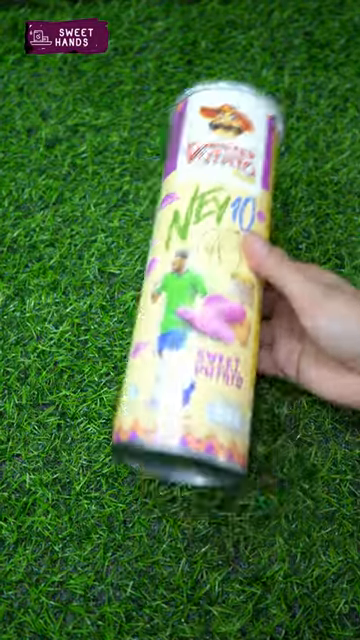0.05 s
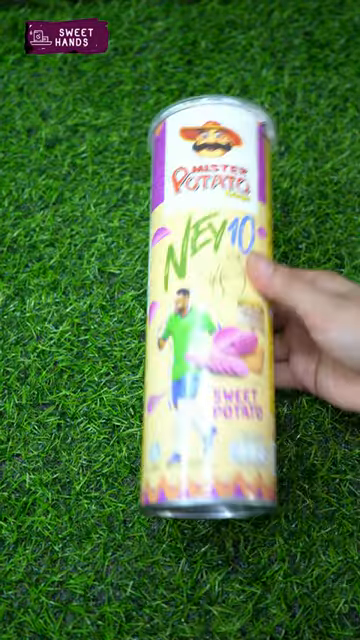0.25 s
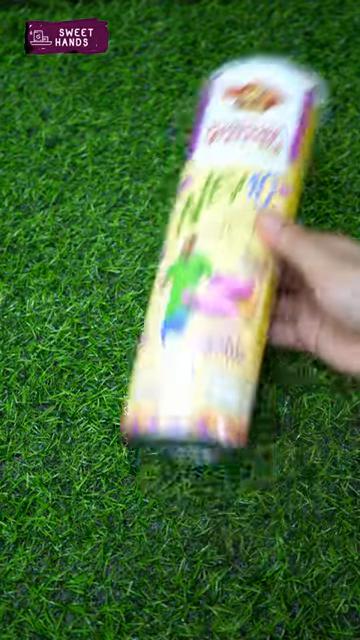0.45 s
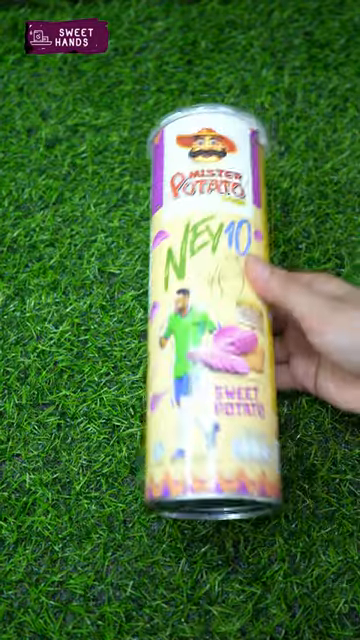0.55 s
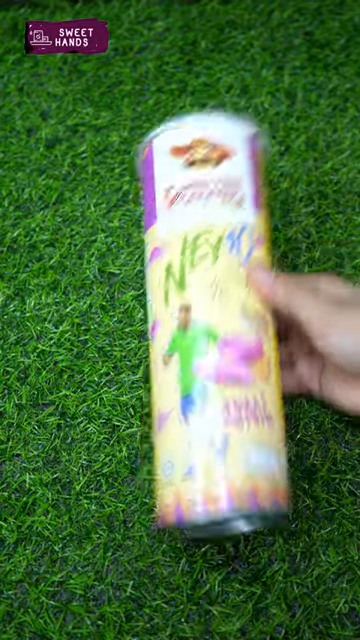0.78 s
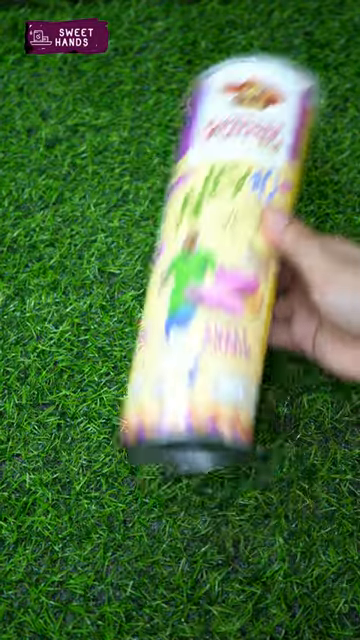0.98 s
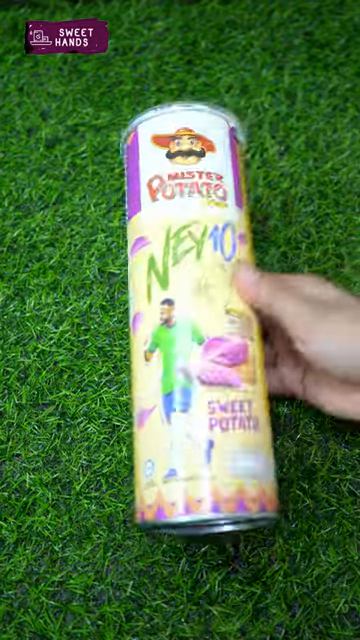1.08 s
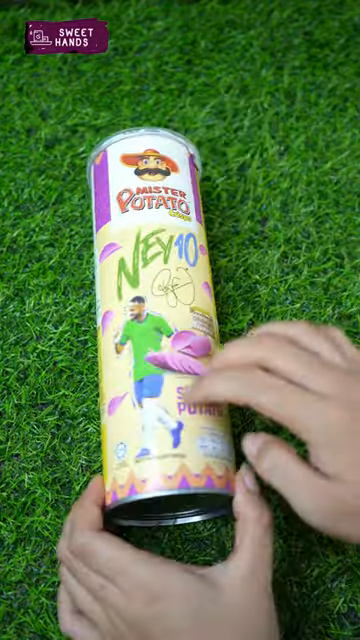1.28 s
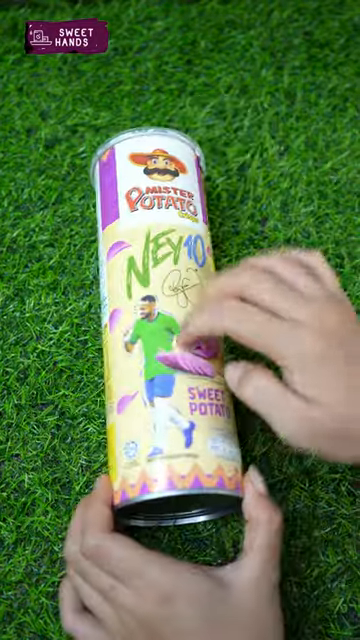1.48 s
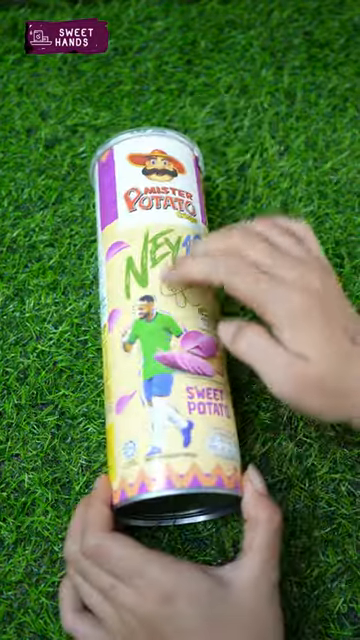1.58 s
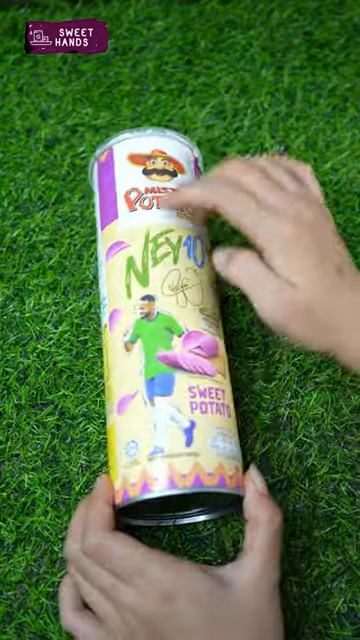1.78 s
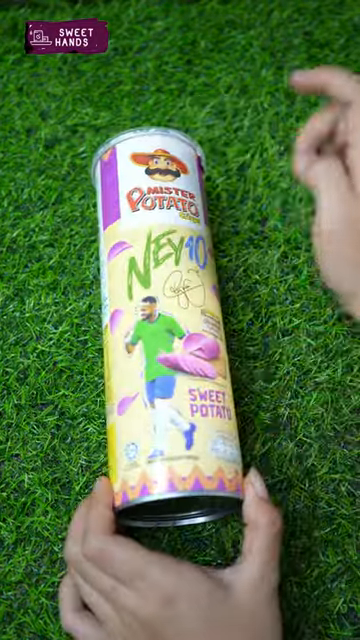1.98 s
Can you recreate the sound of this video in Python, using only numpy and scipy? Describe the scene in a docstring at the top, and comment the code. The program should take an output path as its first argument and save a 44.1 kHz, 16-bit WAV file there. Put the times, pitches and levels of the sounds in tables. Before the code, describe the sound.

Crisps rattle in a shaken cardboard can, then fingernails tap its side.

```python
"""A cardboard can of crisps is shaken lengthwise four times, close up in a small room. The stack slides and
crumbles against the metal base and the plastic lid in turn, and whole crisps knock on both ends. The shaking
ends and all sound drops to silence for a split second. Then the can lies still: fingernails tap its side eight
times while the crisps shift faintly inside."""
import sys
import numpy as np
from scipy import signal
from scipy.fft import rfft, irfft
from scipy.io import wavfile
from scipy.ndimage import uniform_filter1d

SR = 44100
rng = np.random.default_rng(int(sys.argv[2]) if len(sys.argv) > 2 else 0)


def file_out(sig):
    """Save sig as 16-bit WAV at sys.argv[1]."""
    # one column per channel
    cols = np.atleast_2d(sig).T
    # limit, then scale
    lim = np.clip(cols, -1, 1)
    pcm = np.round(lim * 32767).astype(np.int16)
    wavfile.write(sys.argv[1], SR, pcm)


N = 90404
T = np.arange(N) / SR

# stereo image of the textures: (frequency [Hz], left-right correlation)
CORRELATION = [(100, 1), (600, 0.88), (1800, 0.71), (4000, 0.38), (12000, 0.32)]
# spectra of room tone, resting crisps and rubbing crisps: (frequency [Hz], density [dB])
ROOM_TONE_COLOUR = [(15, -41), (25, 1.5), (64, -3), (137, -9.5), (212, -5.5), (256, -6), (1370, -24),
                    (1700, -28), (16000, -36)]
RUSTLE_COLOUR = [(100, -7), (190, 1), (330, -5), (520, 4.5), (700, -2), (1330, -7), (1800, -0.5),
                 (2400, -7.5), (3800, -8.5), (7000, -16), (12000, -18.5), (16000, -30)]
CRUNCH_COLOUR = [(100, -16.5), (300, -16), (800, 3), (1500, 5), (2300, 2.5), (3000, 4.5), (5000, -1),
                 (7500, -3), (11000, -2), (13500, -7), (16000, -17.5)]
# envelope of the shifting crisps: (time [s], level [dB])
RUSTLE_ENVELOPE = [(.11, -62.5), (.128, -36), (.155, -46), (.17, -53), (1.19, -45), (1.235, -46),
                   (1.33, -47.5), (1.478, -46.5), (1.495, -41), (1.515, -49), (1.59, -44), (1.69, -48.5),
                   (1.78, -42.5), (1.83, -45.5), (1.9, -44), (1.95, -51.5), (2.05, -55)]
# hand bumping the can: (time [s], pitch [Hz], level [dB])
GRIP_BUMPS = [(.375, 55.7, -39.5), (1.797, 62.5, -37), (1.871, 49, -47)]
# a crisp or nail scratching: (time [s], level [dB], decay [s])
SCRATCH_CUES = [(0.129, -24.5, 0.0015), (0.352, -26, .005), (.636, -18.5, 0.0054), (0.886, -19, 0.004),
                (0.277, -19.5, 0.0024), (.427, -19, 0.0031), (.598, -21.5, 0.014), (0.652, -16, 0.0025),
                (0.911, -18.5, 0.004), (1.16, -12.5, 0.0095), (1.192, -20, 0.004), (1.491, -37.5, 0.0077),
                (1.632, -31.5, 0.002), (1.857, -31.5, 0.013), (1.9, -38.5, 0.0049)]
# air modes of the tube sounding: (time [s], pitch [Hz], level [dB])
HOOTS = [(.585, 637, -13.5), (0.622, 1130, -14.5), (.811, 671, -11.5), (.843, 674, -18), (1.082, 680, -28),
         (1.155, 1136, -24)]
# finger taps: (time [s], level [dB], wall pitch [Hz], nail [dB], thump [dB],
# nail brightness [Hz], wall ring length [ratio])
FINGER_TAPS = [(1.193, -25.5, 1740, 2, 8, 6000, 1.1), (1.2932, -17, 1745, 3, -5, 3500, 0.63),
               (1.3526, -26, 1720, 9.5, 6, 8040, 1.2), (1.4489, -15, 1804, -1.5, -2, 7050, 1),
               (1.5375, -20.5, 1797, 2.5, -3.5, 7800, 1.23), (1.6166, -17.5, 1866, 3, -4.5, 7300, 0.84),
               (1.7133, -17.5, 1884, 1, -8, 8150, 0.91), (1.7974, -16, 1757, 1.5, -18, 8000, 0.86)]
# modes of the side wall: (frequency [multiple of wall pitch], level [dB], t60 [s])
SIDE_WALL_MODES = [(.9, -14, 0.0069), (1, 1, 0.015), (1.62, -4.5, 0.006), (2.08, 1, 0.0055),
                   (3.0, -11, 0.0071)]
# modes of the whole can, struck on its side, base or lid: (frequency [Hz], level [dB], t60 [s])
WHOLE_TUBE_MODES = [(537, -12, 0.055), (660, -11.5, 0.0276), (786, -15.5, 0.034), (965, -9, 0.012)]
METAL_BASE_MODES = [(397, -7, 0.011), (486, -4, 0.028), (668, -4, 0.026), (732, -5.5, 0.037),
                    (1130, -13, 0.024), (1630, -3, .012), (1802, 3, .02), (3500, -8, 0.012)]
PLASTIC_LID_MODES = [(470, -24.5, 0.061), (628, -5, 0.032), (783, 3.5, .022), (1130, -4.5, 0.021),
                     (1720, -1.5, 0.018), (1866, 5, 0.017), (2670, -2.5, 0.014), (3490, -6, 0.024),
                     (4656, -9, 0.023), (6090, -6, 0.018), (7740, -6.5, 0.011), (9120, -8, 0.014)]
# the stack landing on an end: (time [s], level [dB], rise [s], fall [s])
BASE_LANDINGS = [(.238, -28.5, 0.016, 0.053), (.505, -24, 0.026, 0.03), (.775, -25, 0.032, 0.029),
                 (1.046, -24.5, 0.037, 0.026)]
LID_LANDINGS = [(.361, -20.5, 0.017, .024), (.638, -21.5, 0.026, 0.028), (.898, -24, 0.031, 0.037),
                (1.165, -22, 0.032, .028)]
# whole crisps knocking on an end: (time [s], thud [dB], crack [dB])
BASE_CRISP_HITS = [(.128, -33.5, -30), (.139, -59, -36), (.154, -41, -37.5), (.226, -19, -46),
                   (.316, -23, -32), (0.4845, -15, -21.5), (0.504, -18.5, -31), (.517, -10.5, -29),
                   (0.5243, -10, -16.5), (.5315, -8.5, -19), (.552, -50, -22), (0.7614, -21, -18.5),
                   (.7835, -43, -18), (0.775, -12.5, -46), (.788, -8, -28), (.815, -18, -27),
                   (.829, -26, -19.5), (1.028, -16, -25), (1.049, -18.5, -17.5), (1.069, -6.5, -24)]
LID_CRISP_HITS = [(0.366, -51, -21), (.374, -22.5, -19), (.402, -36, -29), (.617, -20, -19),
                  (.653, -22, -35), (.877, -25.5, -25), (.891, -41, -16), (.912, -16.5, -19.5),
                  (1.155, -22, -20.5)]

CONTACTS_PER_S, END_HITS_PER_S, SIZE_SPREAD_DB = 24000, 3000, 2
CRUMBLE_DB, CRUMBLE_S, THUD_HZ, CRACK_HZ = -9, 0.0036, 920, 1480
NAIL_TICK_DB, NAIL_GRIT_DB, NAIL_GRIT_S, NAIL_TOP_HZ = 11.5, -3.5, 0.0029, 14200
THUMP_DB, THUMP_DELAY_S, WALL_SCATTER_DB = -9, 0.0027, 1.5
SHAKE_REVERB_DB, TAP_REVERB_DB = -15, -19
SHAKE_END_S, RESUME_S, FADE_S = 1.172, 1.1915, 0.013


def amp(db):
    """Decibels to gain."""
    return 10 ** (np.asarray(db) / 20)


def unit(x):
    """Scale to rms 1."""
    return x / np.sqrt(np.mean(x ** 2) + 1e-20)


def pan(x, left_db):
    """Opposite trims on left and right."""
    return x * amp([[left_db], [-left_db]])


def cut(x, hz, kind, order=2):
    """Low- or high-pass."""
    return signal.sosfilt(signal.butter(order, min(hz, SR * .45), kind, fs=SR, output="sos"), x + 1e-18)


def click(s):
    """One unit click."""
    return 1.0 * (np.arange(N) == int(s * SR))


def burst(s, decay_s):
    """Hard attack, exponential decay."""
    return (T >= s) * np.exp(-np.maximum(T - s, 0) / decay_s)


def grains(per_s):
    """Random contacts of uneven size; rms 1."""
    sizes = amp(SIZE_SPREAD_DB * np.minimum(rng.exponential(1, N), 5)) * rng.choice([-1, 1], N)
    return unit(sizes * (rng.random(N) < per_s / SR))


def coloured(mid, side, colour):
    """Stereo texture with a given spectrum, wider in the treble; rms 1."""
    log_hz = np.log(np.fft.rfftfreq(N, 1 / SR) + 1)
    db, alike = [np.interp(log_hz, np.log(hz), values)
                 for hz, values in (np.transpose(colour), np.transpose(CORRELATION))]
    spectrum = np.sqrt(1 + alike) * rfft(mid) + np.sqrt(1 - alike) * rfft(side) * [[1], [-1]]
    return unit(irfft(amp(db) * spectrum, N))


def ring(x, hz, t60):
    """One resonance: a unit click rings a sine of height 1."""
    r, w = amp(-60 / (t60 * SR)), 2 * np.pi * hz / SR
    return signal.lfilter([0, np.sin(w)], [1, -2 * r * np.cos(w), r * r], x + 1e-18)


def body(x, modes):
    """The can's ringing modes, a touch to the right."""
    return pan(sum(amp(db) * ring(x, hz, t60) for hz, db, t60 in modes), left_db=-0.33)


def room_tone(level_db=-52):
    """A steady bed of low rumble and faint hiss."""
    return amp(level_db) * coloured(*rng.standard_normal((2, N)), ROOM_TONE_COLOUR)


def reverb(x, t60=0.33, damping_hz=3740):
    """Dull, quickly dying reflections of a small room."""
    t = T[:SR // 2]
    tail = cut(rng.standard_normal((2, len(t))), 910, "high") + rng.standard_normal(len(t))
    tail = cut(tail, damping_hz, "low", order=1) * amp(-60 * t / t60) * (t > .003)
    return signal.fftconvolve(x, tail / np.sqrt(np.sum(tail ** 2) / 2), axes=1)[:, :N]


def with_reflection(x, delay_s=0.017, level_db=-27):
    """A bright early reflection from the side widens the can."""
    reflection = np.interp(T - delay_s, T, cut(x.mean(0), 1510, "high", order=1))
    return x + amp(level_db) * reflection * np.array([[1], [-1]])


def grip_bumps():
    """Soft low thuds as the grip shifts."""
    return sum(amp(db) * ring(click(s), hz, t60=0.19) for s, hz, db in GRIP_BUMPS)


def rustle(per_s=9000):
    """Crisps shifting: a faint, dull bed of contacts under the shakes and taps."""
    envelope = amp(np.interp(T, *np.transpose(RUSTLE_ENVELOPE)))
    return envelope * coloured(grains(per_s), grains(per_s), RUSTLE_COLOUR)


def rubbing():
    """Crisp on crisp: a bright, dense spray of tiny contacts."""
    return coloured(grains(CONTACTS_PER_S), grains(CONTACTS_PER_S), CRUNCH_COLOUR)


def scratches(attack_s=0.0004):
    """A crisp or nail scrapes in short runs of contacts."""
    envelope = sum(amp(db) * burst(s, decay) * (1 - burst(s, attack_s)) for s, db, decay in SCRATCH_CUES)
    return envelope * rubbing()


def hoots(attack_s=0.002, decay_s=0.012):
    """The hollow tube sings briefly on one of its air modes."""
    return sum(amp(db) * burst(s, decay_s) * (1 - burst(s, attack_s)) * np.sin(2 * np.pi * hz * (T - s))
               for s, hz, db in HOOTS)


def finger_taps():
    """The nail ticks, wall and tube ring, then the fingertip thumps the can against the ground."""
    out = 0
    for s, db, wall_hz, nail_db, thump_db, nail_hz, ring_length in FINGER_TAPS:
        hit = click(s)
        wall_modes = [(wall_hz * ratio, level + WALL_SCATTER_DB * rng.normal(), t60 * ring_length)
                      for ratio, level, t60 in SIDE_WALL_MODES]
        cardboard = cut(body(hit, wall_modes + list(WHOLE_TUBE_MODES)), 264, "high", order=1)
        grit = amp(NAIL_GRIT_DB) * burst(s, NAIL_GRIT_S) * rng.standard_normal((2, N))
        tick = cut(grit - amp(NAIL_TICK_DB) * hit, nail_hz, "low", order=1)
        nail = amp(nail_db) * cut(tick, NAIL_TOP_HZ, "low")
        thump = amp(THUMP_DB + thump_db) * ring(click(s + THUMP_DELAY_S), hz=145.7, t60=0.042)
        out = out + amp(db) * (cardboard + nail + thump)
    return out


def clumps(depth_db=0.8, length_s=0.0026):
    """Quick level flutter as crisps catch and slip."""
    flutter = unit(uniform_filter1d(rng.standard_normal(N), int(length_s * SR)))
    return unit(amp(depth_db * flutter))


def crisp_knocks(hits):
    """Whole crisps strike and crumble, each blow split into a low thud and a high crack."""
    crumbs = amp(CRUMBLE_DB) * grains(CONTACTS_PER_S) / np.sqrt(CRUMBLE_S * SR / 2)
    thuds = cracks = 0
    for s, thud_db, crack_db in hits:
        blow = click(s) + crumbs * burst(s, CRUMBLE_S)
        thuds = thuds + amp(thud_db) * blow
        cracks = cracks + amp(crack_db) * blow
    return cut(thuds, THUD_HZ, "low", order=4) + cut(cracks, CRACK_HZ, "high")


def stack_on_end(landings, hits, modes, ring_db, crunch_db, rounding_s=0.0031):
    """The stack crunches against one end; crumbs and whole crisps keep that end ringing."""
    power = 0
    for s, db, rise, fall in landings:
        from_peak_s = np.hypot(T - s, rounding_s) - rounding_s   # rounds the top of the swell
        power = power + amp(db) ** 2 * np.exp(-2 * from_peak_s / np.where(T < s, rise, fall))
    swell = np.sqrt(power)
    crunch = amp(crunch_db) * swell * clumps() * rubbing()
    body_gain = np.sqrt(np.sum(body(click(0), modes) ** 2) / 2)
    patter = amp(ring_db) * swell * grains(END_HITS_PER_S) / body_gain
    ringing = body(patter + crisp_knocks(hits), modes)
    return crunch + cut(ringing, 368, "high", order=3)


def scene():
    """Shaking, an instant of dead silence, then tapping."""
    base = stack_on_end(BASE_LANDINGS, BASE_CRISP_HITS, METAL_BASE_MODES, ring_db=1.5, crunch_db=1.5)
    lid = stack_on_end(LID_LANDINGS, LID_CRISP_HITS, PLASTIC_LID_MODES, ring_db=0, crunch_db=-0.5)
    shake = with_reflection(base + lid + hoots())
    taps = with_reflection(finger_taps())
    shake = (shake + amp(SHAKE_REVERB_DB) * reverb(shake)) * (T < SHAKE_END_S)
    taps = taps + amp(TAP_REVERB_DB) * reverb(taps)
    can = shake + taps + scratches() + rustle() + grip_bumps()
    gate = np.clip((SHAKE_END_S - T) / FADE_S, 0, 1) + (T > RESUME_S)
    return (pan(can, left_db=-0.5) + room_tone()) * gate


def record(dry, ceiling=0.5, top_hz=16000):
    """Soft-clip the peaks, then roll off the top steeply."""
    rounded = ceiling * np.tanh(dry / ceiling)
    return signal.sosfilt(signal.ellip(10, .2, 80, top_hz, fs=SR, output="sos"), rounded)


dry = scene()
out = record(dry)
file_out(out)
```